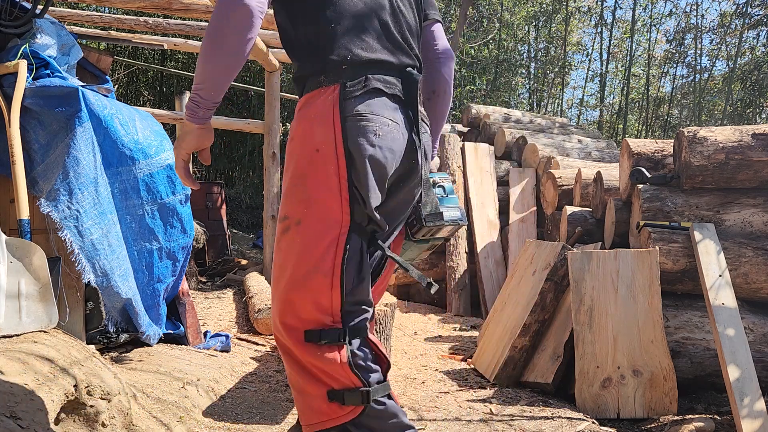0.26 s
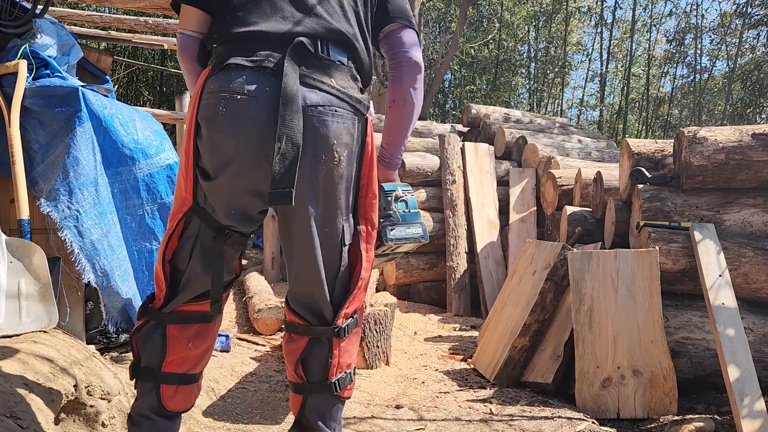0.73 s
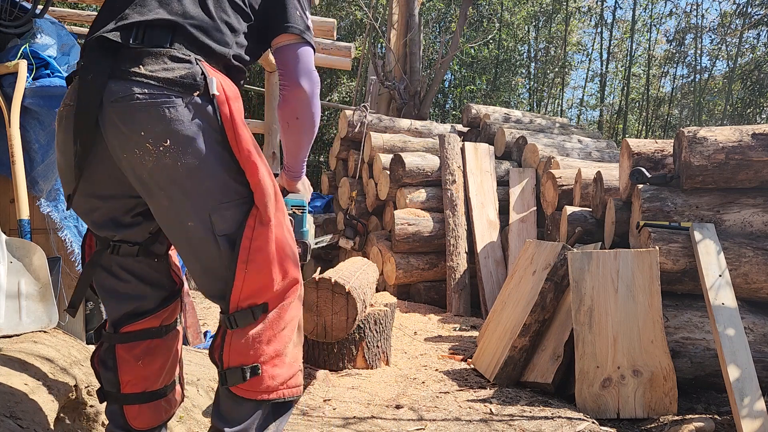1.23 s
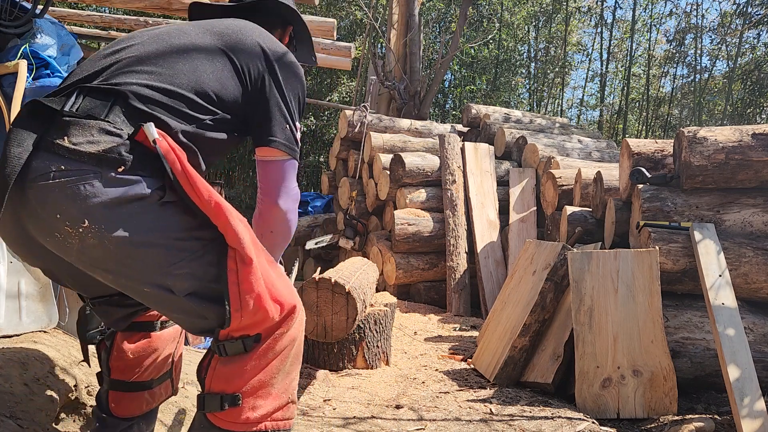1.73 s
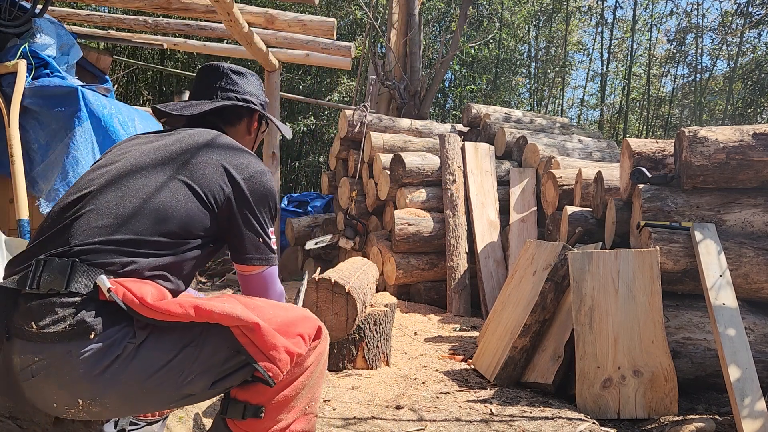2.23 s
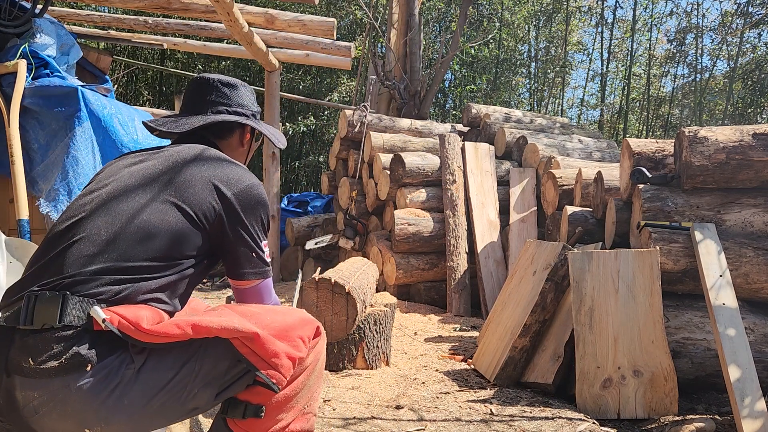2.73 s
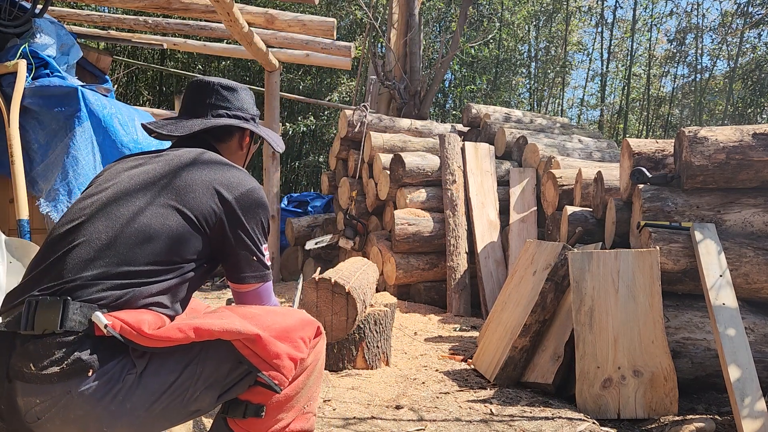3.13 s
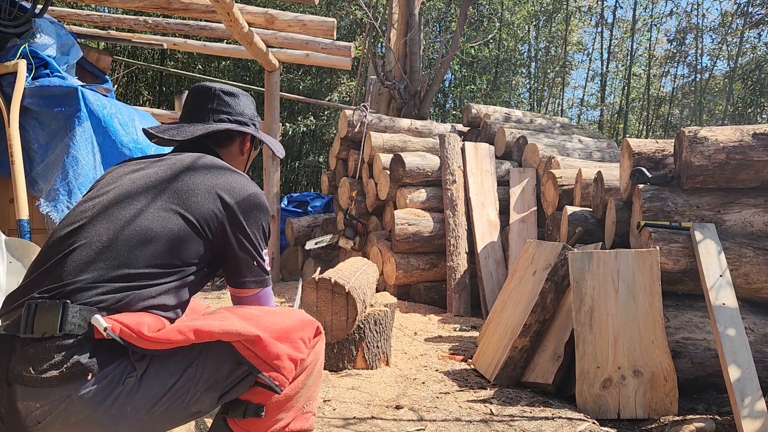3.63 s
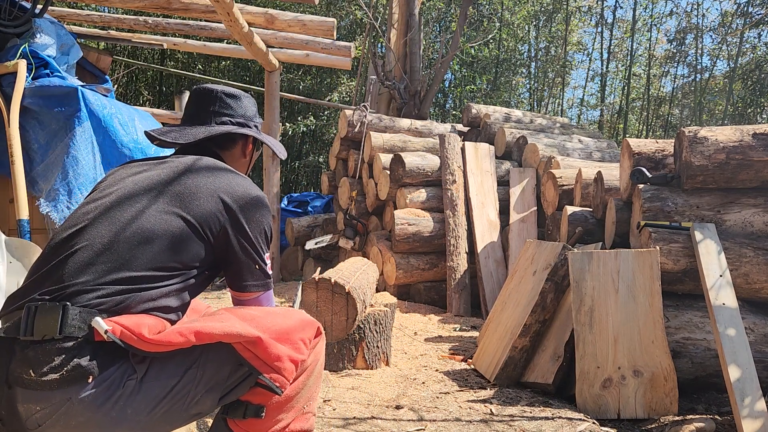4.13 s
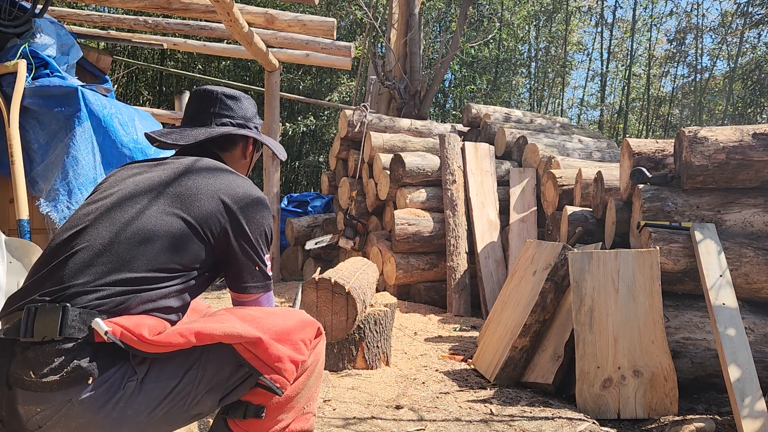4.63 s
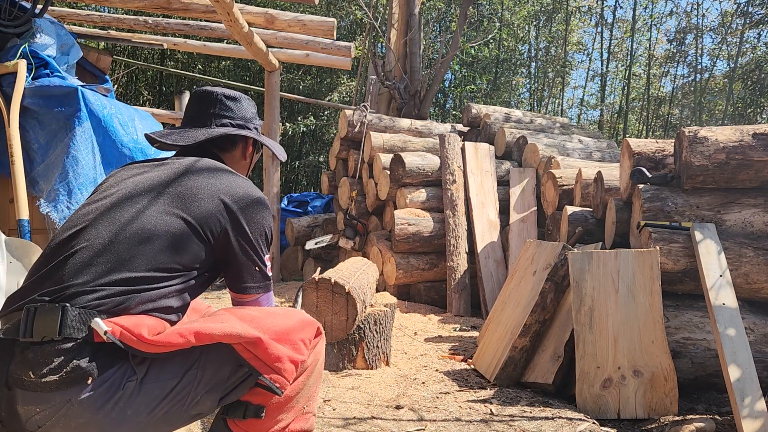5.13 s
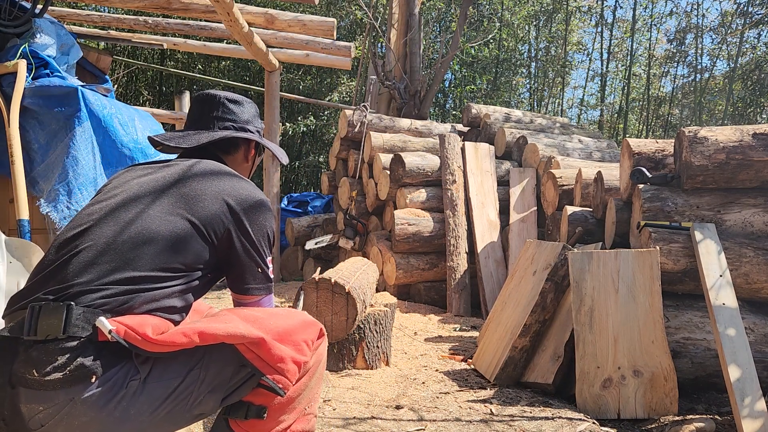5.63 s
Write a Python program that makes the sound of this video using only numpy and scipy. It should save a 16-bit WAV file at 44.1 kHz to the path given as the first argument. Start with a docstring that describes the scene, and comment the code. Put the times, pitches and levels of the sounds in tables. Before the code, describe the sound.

Quiet footsteps and rustling chaps in a woodyard, then a battery chainsaw spins up to a loud, steady, clattering high whine.

```python
"""Woodyard, outdoors: a man steps over sawdust to a log, his chaps rustling, then squeezes a chainsaw trigger.
The battery saw runs up and whirs freely: links beat on a six-tooth sprocket (sine whine and partials),
clatter round the bar (clicks and noise through resonances) and hiss in its groove (high clicks and noise).
Decaying noise as an echo gives the scatter off woodpiles; boots are damped thuds and grit, cloth is noise
grains, and the open air is a quiet low noise rumble."""
import sys
import numpy as np
from scipy import signal
from scipy.fft import rfft, irfft, next_fast_len
from scipy.io import wavfile
from scipy.ndimage import uniform_filter1d

SR = 44100
rng = np.random.default_rng(int(sys.argv[2]) if len(sys.argv) > 2 else 0)


def generate_wav(signal):
    """Clip the signal to [-1, 1] and save it as 16-bit WAV at the path in sys.argv[1]."""
    frames = np.transpose(np.atleast_2d(signal))
    scaled = np.clip(frames, -1, 1) * 32767
    pcm = np.round(scaled).astype(np.int16)
    wavfile.write(sys.argv[1], SR, pcm)


N = 258867
T = np.arange(N) / SR

LINKS, TEETH = 52, 6  # chain loop, sprocket
TRIGGER_S = 1.632


def saw():
    """Whine plus chain noise, gated at the trigger; the saw is nearer the left port, so the right lags."""
    link_hz = speed() * (1 + 0.0012 * walk(70))
    links = np.cumsum(link_hz) / SR
    rattle = ports(woodpiles(chain(links, link_hz), wet_db=-4.5, t60_s=0.054))
    gate = np.clip((T - TRIGGER_S) / 0.0048, 0, 1)
    left, right = (whine(links, link_hz) + rattle) * gate
    lag_samples = 3
    return np.array([left, np.pad(right, (lag_samples, 0))[:N]])


# Brief speed sags: start_s, fall_s, hold_s, recovery_s, depth_links_per_s
SPEED_SAGS = [(3.08, .16, .02, .3, 30), (4.84, .21, .26, .15, 38)]
START_HZ, FULL_HZ = 120, 1293.3  # links per second
RAMP_HZ_PER_S, RAMP_S, SETTLE_S = 2650, 0.345, 0.255


def speed():
    """Links per second: an even motor ramp, an exponential approach to full speed, and brief sags."""
    t = np.maximum(T - TRIGGER_S, 0)
    ramp = START_HZ + RAMP_HZ_PER_S * np.minimum(t, RAMP_S)
    settling = np.exp(-np.maximum(t - RAMP_S, 0) / SETTLE_S)
    link_hz = FULL_HZ - (FULL_HZ - ramp) * settling
    for *times_s, depth_hz in SPEED_SAGS:
        link_hz = link_hz - depth_hz * np.interp(T, np.cumsum(times_s), [0, 1, 1, 0])
    return link_hz


def whipping(link_hz):
    """Chain whip (0-1) below full speed, which smears and breaks the tones."""
    return np.clip((1 - link_hz / FULL_HZ) * 3.5, 0, 1)


def growth_db(link_hz, knee_hz, power):
    """Level that follows a power of the chain speed and levels off above a knee."""
    return -10 * np.log10(1 + (knee_hz / link_hz) ** (2 * power))


# Link tone as the saw is moved: time_s, level_db, left_minus_right_db
LINK_TONE = [(1.65, -61, 2), (1.88, -34.5, 3), (1.97, -23.5, 8), (2.08, -31, 3), (2.2, -22, 0),
             (2.39, -25, 12.5), (2.51, -17, 1), (2.7, -18.5, 3), (2.9, -22.5, -6), (3.2, -18.5, 2),
             (3.45, -19, 0.5), (3.57, -18.5, -4.5), (3.8, -16, 1.5), (4.8, -16, -2), (4.95, -13.5, 0),
             (5.24, -20, 4.5), (5.47, -19, -3), (5.85, -19, -0.5)]
# Cutter overtones, one cutter every second link: multiple_of_cutter_rate, base_level_db
CUTTER_OVERTONES = [(3, -37.5), (5, -42), (6, -35.3), (7, -38), (8, -39.5), (9, -40.5), (10, -41),
                    (11, -33), (12, -44), (22, -41)]
# Sprocket and motor: multiple_of_shaft_rate, base_level_db
SHAFT_TONES = [(1, -53), (4, -52), (8, -38), (10, -44)]
# Uneven chain: multiple_of_loop_rate, base_level_db
LOOP_TONES = [(13, -58), (63, -38.5), (67, -44), (93, -40), (165, -46)]
# Tones that stand out as the saw is tilted: start_s, end_s, multiple_of_cutter_rate, lift_db
TILT_SWELLS = [(1.88, 2.246, 4, 8), (1.917, 2.5, 6, 0.5), (2.166, 2.346, 1, 4.5), (2.2, 2.65, 5, 4),
               (2.648, 3.152, 1, 9), (2.72, 3.18, 4, 6.5), (3.0, 3.53, 5, 6.5), (3.12, 3.48, 7, 2),
               (3.373, 3.58, 4, 7), (3.483, 4.253, 1, 5.5), (3.52, 4.8, 3, 3.5), (4.417, 5.334, 7, 8),
               (4.8, 5.316, 4, 4), (4.902, 5.08, 1, 8), (5.418, 6, 1, 13)]
CUTTER_DB, OCTAVE_DB = -40.5, -33  # high-speed limits, before swells


def whine(links, link_hz):
    """Links strike the sprocket in a steady tone; cutters, shaft and chain loop add their own series."""
    link_db, pan_db = curves(LINK_TONE)
    cutter_db = CUTTER_DB + growth_db(link_hz, knee_hz=1120, power=6.8) + swell_db(1, TILT_SWELLS)
    octave_db = OCTAVE_DB + growth_db(link_hz, knee_hz=444, power=4.1) + swell_db(4, TILT_SWELLS)
    whip = whipping(link_hz)
    phase = 2 * np.pi * links + 0.85 * whip * walk(170)
    flutter_db = 0.4 + 3 * whip
    sides = np.array([[0.5], [-0.5]])

    link_gain = undb(link_db + sides * pan_db + flutter_db * walk(60))
    cutter_gain = undb(cutter_db + sides * 2.6 + 2.36 * walk(30))
    octave_gain = undb(octave_db + sides * 7.3 + (1.5 + flutter_db) * walk(60))
    link = link_gain * np.sin(phase + sides * 0.43)
    cutter = cutter_gain * np.sin(phase / 2 + sides * 0.71)
    octave = octave_gain * np.sin(2 * phase)

    upper = tones(phase / (4 * np.pi), link_hz / 2, CUTTER_OVERTONES, TILT_SWELLS)
    shaft = tones(links / TEETH, link_hz / TEETH, SHAFT_TONES)
    loop = tones(links / LINKS, link_hz / LINKS, LOOP_TONES)
    partial_gain = np.minimum(link_hz / 900, 1) ** 3
    return np.sqrt(2) * (link + cutter + octave) + partial_gain * (upper + shaft + loop)


# Housing resonances swept by the partials: center_hz, width_hz, lift_db
HOUSING_MODES = [(3120, 130, 13), (3530, 280, 8), (4380, 70, 7)]


def tones(turns, turn_hz, table, swells=()):
    """Partials of a rotation, lifted by the housing; each swells and shifts at each port as the saw moves."""
    out = np.zeros((2, N))
    for multiple, db in table:
        order, drift, start = np.round(multiple), walk(2.96), rng.random()
        lift_db = swell_db(order, swells)
        for center_hz, width_hz, peak_db in HOUSING_MODES:
            detune = 2 * (order * turn_hz - center_hz) / width_hz
            lift_db = lift_db + peak_db / (1 + detune ** 2)
        for side in range(2):
            phase = 2 * np.pi * (order * turns + start) + 0.5 * walk(2.13)
            out[side] += undb(db + lift_db + 1.9 * (drift + walk(5))) * np.sin(phase)
    return np.sqrt(2) * out


def swell_db(order, swells, fade_s=0.094):
    """Lift of one tone: each swell fades in, holds and fades out."""
    def fade(s):
        return np.clip(s / fade_s + 0.5, 0, 1)

    return sum(db * fade(T - start) * fade(end - T)
               for start, end, multiple, db in swells if np.round(multiple) == order)


# Clatter spectrum: frequency_hz, relative_density_db
CLATTER_COLOUR = [(60, -58), (150, -24.5), (210, -13), (260, -11.5), (320, -5), (480, -11), (590, -1),
                  (950, -2.5), (1300, 1.5), (1700, 3), (2500, 2), (3300, 0), (4300, 0), (5500, -8),
                  (9000, -23)]
# Groove hiss spectrum: frequency_hz, relative_density_db
HISS_COLOUR = [(2000, -51), (4000, 2), (5000, 0.5), (5900, 0), (7400, 5), (8400, 1), (9400, -8.5),
               (10400, 0), (11700, 2.5), (13200, 1.5), (14500, 3.5), (15800, -1.5)]
# Bar and cover knocked by single links: center_hz, width_hz, relative_level_db
BAR_MODES = [(690, 31, 1), (1248, 37, 9), (1510, 140, -1), (4450, 170, -9)]
# High-speed gain limits, before the layer mixes
CLATTER_DB, CLATTER_KNEE_HZ, CLATTER_POWER = -29, 546, 1.8
HISS_DB, HISS_KNEE_HZ, HISS_POWER = -21, 836, 2.48
WHIP_CLATTER_DB = 3  # extra at full whip


def chain(links, link_hz):
    """Link impacts rattle the bar and housing; steel sliding in the groove hisses in time with the cutters."""
    clatter_db = CLATTER_DB + growth_db(link_hz, CLATTER_KNEE_HZ, CLATTER_POWER)
    clatter_db = clatter_db + WHIP_CLATTER_DB * whipping(link_hz)
    hiss_db = HISS_DB + growth_db(link_hz, HISS_KNEE_HZ, HISS_POWER)
    # slow: the bar rings link by link; fast: a blurred whirr
    blur = np.minimum(link_hz / 1200, 1)
    rub = 1 + 0.073 * np.sin(np.pi * links) + 0.058 * np.sin(4 * np.pi * links) + 0.11 * walk(160)

    clicks = pair(np.array([impacts(links, scatter_db=1.5, play=0.061) for _ in range(3)]), 0.6)
    ring = 0
    for center_hz, width_hz, db in BAR_MODES:
        b, a = signal.iirpeak(center_hz, center_hz / width_hz, SR)
        ring = ring + undb(db) * signal.lfilter(b, a, clicks)
    whirr = undb(3.0) * blur * rub * noise(CLATTER_COLOUR, shared=0.6)
    clatter = colour(clicks, CLATTER_COLOUR) + whirr
    clatter = clatter + undb(-14.5 + 24.5 * (1 - blur)) * unit(ring)

    sparks = pair(np.array([impacts(links, scatter_db=-1.5, play=0.4015) for _ in range(3)]), 0.31)
    hiss = undb(2.0) * rub * noise(HISS_COLOUR, shared=0.35) + undb(-3.5) * colour(sparks, HISS_COLOUR)
    return undb(clatter_db) * clatter + undb(hiss_db) * hiss


def impacts(links, scatter_db, play):
    """One click a link; each link's own size and slack come round again with every loop."""
    k = np.arange(1, int(links[-1]))
    own = rng.standard_normal((LINKS, 2))[k % LINKS]
    chance = rng.standard_normal((8192, 2))[k]
    at = np.interp(k + 0.296 * own[:, 0] + play * chance[:, 0], links, np.arange(N))
    size = own[:, 1] * undb(scatter_db * chance[:, 1])
    # sinc taps place clicks between samples
    taps = at.astype(int)[:, None] + np.arange(-5, 7)
    weights = size[:, None] * np.sinc(taps - at[:, None])
    return unit(np.bincount(np.clip(taps, 0, N - 1).ravel(), weights.ravel(), N))


# Ports face different ways: frequency_hz, left_minus_right_db
PORT_LEAN = [(300, 1.5), (1250, 3.5), (1600, 8), (2400, 0), (3200, 2.5), (5800, 2), (6800, 4), (7600, 6.5),
             (8600, -2.5), (10500, 1), (11800, -0.5), (13200, -1.5), (15600, 9.5)]
ALIKE_BELOW_HZ = 640  # long waves reach both ports alike


def ports(x):
    """Each port favours some bands of the chain noise; the bass is nearly the same at both."""
    hz, db = np.transpose(PORT_LEAN)
    size = next_fast_len(N)
    f = np.fft.rfftfreq(size, 1 / SR)
    lean_db = np.interp(f, hz, db) / 2
    both = rfft(x, size)
    mid = both.mean(axis=0)
    both = mid + (both - mid) * f / np.hypot(f, ALIKE_BELOW_HZ)
    return irfft(both * undb([lean_db, -lean_db]), size)[:, :N]


def woodpiles(x, wet_db, t60_s):
    """A short scatter of reflections from logs and shed, as decaying noise after a 6 ms gap."""
    t = np.arange(SR // 3) / SR
    tail = rng.standard_normal((2, len(t))) * undb(-60 * t / t60_s) * (t > 0.006)
    tail /= np.sqrt(np.sum(tail ** 2, axis=1, keepdims=True))
    return x + undb(wet_db) * signal.fftconvolve(x, tail, axes=1)[:, :N]


# Cloth and grit spectrum: frequency_hz, relative_density_db
RUSTLE_COLOUR = [(300, -2), (700, 3), (1300, 3.5), (2200, -3), (3600, -5), (5000, -13.5), (9000, -49)]
# Cloth swish spectrum: frequency_hz, relative_density_db
SWISH_COLOUR = [(3000, 1.5), (4500, -1), (6000, -2), (7800, 1.5), (9400, -18), (11500, -9), (15500, -16)]


def clothes():
    """Stiff cloth and sawdust crackle in small grains as the man walks up; a swish lies on top."""
    rustle_gain, swish_gain = strokes()
    grains_per_s = 500
    grains = (rng.random((3, N)) < grains_per_s / SR) * rng.standard_normal((3, N))
    crackle = colour(pair(grains, 0.6), RUSTLE_COLOUR) + 0.6 * noise(RUSTLE_COLOUR, shared=0.5)
    rustle = rustle_gain * undb(2 * walk(150)) * unit(crackle)
    swish = swish_gain * undb(1.1 * walk(140)) * noise(SWISH_COLOUR, shared=0.12)
    return rustle + swish


# Chaps strokes as the legs move: start_s, rise_s, t60_s, rustle_gain_db, swish_gain_db
LEG_STROKES = [(.136, .006, 0.8, -45.5, -57), (.258, 0.018, 0.18, -47, -48.5),
               (.45, 0.287, 0.079, -57, -53.5), (.875, .025, 0.7, -56, -71), (.97, 0.11, .13, -47, -61),
               (1.5, 0.13, .1, -58, -62)]
RUSTLE_DB, SWISH_DB = -66, -64  # gain of the cloth between strokes


def strokes():
    """Gains of rustle and swish: each stroke builds up and dies away over a faint steady rub."""
    rustle, swish = undb(RUSTLE_DB), undb(SWISH_DB)
    for start_s, rise_s, t60_s, rustle_db, swish_db in LEG_STROKES:
        rise = np.clip((T - start_s) / rise_s, 0, 1)
        shape = rise * undb(-60 * np.maximum(T - start_s - rise_s, 0) / t60_s)
        rustle = np.hypot(rustle, undb(rustle_db) * shape)
        swish = np.hypot(swish, undb(swish_db) * shape)
    return rustle, swish


# Soft thuds of boots and heavy cloth: start_s, relative_level_db, pitch_hz, t60_s
SOFT_THUDS = [(0.445, -48, 61.9, 0.067), (0.516, -39, 99.6, 0.079), (0.567, -48, 61.9, 0.07),
              (0.823, -29.5, 230, 0.038), (1.337, -25, 110, 0.052), (1.401, -28, 145, 0.05),
              (1.433, -35, 61.9, 0.07), (1.669, -21, 149, 0.11), (1.716, -22.5, 205, 0.058),
              (1.746, -18, 134, 0.036), (2.168, -35, 85, 0.061)]
# Scuffs and buckle ticks: start_s, relative_level_db, t60_s
GRIT_SCUFFS = [(0.139, -31, 0.03), (0.175, -29, 0.027), (0.271, -26, 0.03), (0.759, -30.5, 0.029),
               (0.89, -37, 0.03), (1.005, -27, 0.025), (1.093, -26, 0.03), (1.336, -28, 0.024),
               (1.635, -22, 0.03)]


def steps():
    """Dull, quickly damped thuds and short gritty scuffs."""
    out = np.zeros((2, N))
    dull_colour = [(30, -19), (100, 2.5), (350, -2.5), (800, -18), (3000, -45), (9000, -68)]  # Hz, dB
    dull = noise(dull_colour, shared=0.88)
    grit = noise(RUSTLE_COLOUR, shared=0.13)
    for start_s, db, pitch_hz, t60_s in SOFT_THUDS:
        t = np.maximum(T - start_s, 0)
        envelope = undb(db - 60 * t / t60_s) * np.minimum(t / 0.002, 1)
        out += envelope * (0.56 * np.sin(2 * np.pi * pitch_hz * t) + 0.54 * dull)
    for start_s, db, t60_s in GRIT_SCUFFS:
        t = np.maximum(T - start_s, 0)
        out += undb(db - 13 - 60 * t / t60_s) * np.minimum(t / 0.00077, 1) * grit
    return woodpiles(out, wet_db=-10.5, t60_s=0.23)


# Open-air spectrum: frequency_hz, relative_density_db
AIR_COLOUR = [(20, -4), (35, 2), (55, 5), (90, -2.5), (150, -6.5), (430, -10), (700, -11), (1500, -21.5),
              (3000, -37.5), (5100, -60), (7500, -42), (9500, -60), (15000, -45)]


def outdoors():
    """A low, gently swelling rumble of open air, nearly alike at both ports."""
    return undb(-51.0 + 1.1 * walk(4.2)) * noise(AIR_COLOUR, shared=0.88)


def undb(db):
    """Decibels to gain."""
    return 10 ** (np.asarray(db) / 20)


def curves(table):
    """Each column of a table, joined by straight lines in time."""
    time_s, *columns = np.transpose(table)
    return [np.interp(T, time_s, column) for column in columns]


def unit(x):
    """Scale to rms 1."""
    return x / np.sqrt(np.mean(x ** 2) + 1e-18)


def colour(x, points):
    """Filter by a (Hz, dB) outline; rms 1."""
    hz, db = np.transpose(points)
    size = next_fast_len(N)
    f = np.maximum(np.fft.rfftfreq(size, 1 / SR), 1)
    gain = undb(np.interp(np.log(f), np.log(hz), db))
    return unit(irfft(rfft(x, size) * gain, size)[..., :N])


def walk(rate_hz):
    """Smooth random drift, rms 1."""
    steps_at_rate = np.interp(T * rate_hz, np.arange(1024), rng.standard_normal(1024))
    return unit(uniform_filter1d(steps_at_rate, int(SR / rate_hz / 2) + 1))


def pair(three, shared):
    """Two ports hear one common signal (power share 0-1) and one of their own each."""
    shared = np.clip(shared, 0, 1)
    return np.sqrt(shared) * three[0] + np.sqrt(1 - shared) * three[1:]


def noise(points, shared):
    """Coloured stereo noise, rms 1."""
    return colour(pair(rng.standard_normal((3, N)), shared), points)


def scene():
    """The saw over the man's movements and the open air, which lean slightly left."""
    return saw() + (clothes() + steps() + outdoors()) * undb([[0.9], [-0.9]])


def record(dry):
    """A steep elliptic low-pass cuts the top, as in a phone."""
    top_hz = 15900
    lowpass = signal.ellip(12, 0.1, 80, top_hz, fs=SR, output="sos")
    return signal.sosfilt(lowpass, dry)


dry = scene()
out = record(dry)
generate_wav(out)
```